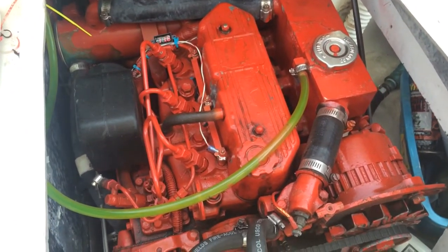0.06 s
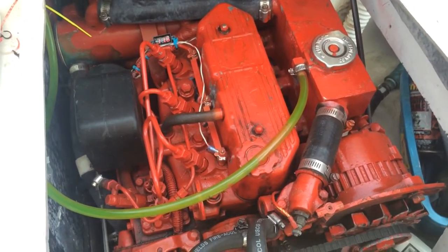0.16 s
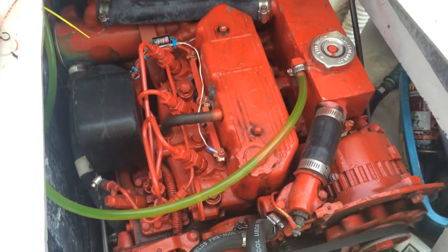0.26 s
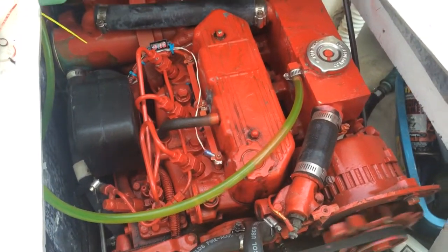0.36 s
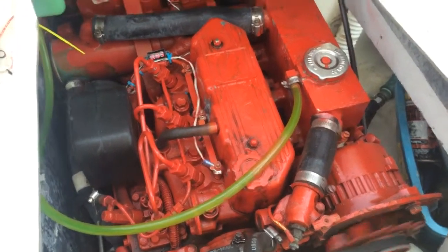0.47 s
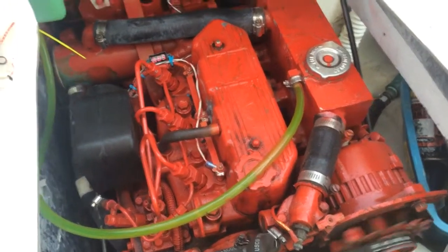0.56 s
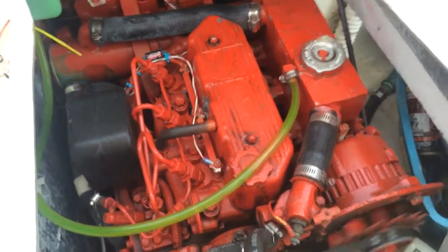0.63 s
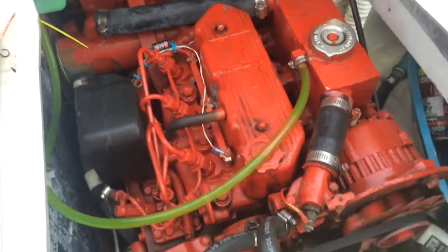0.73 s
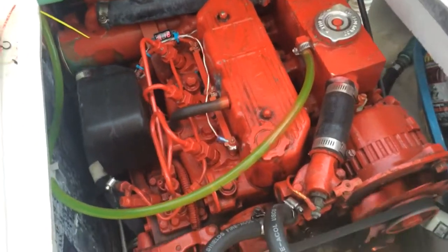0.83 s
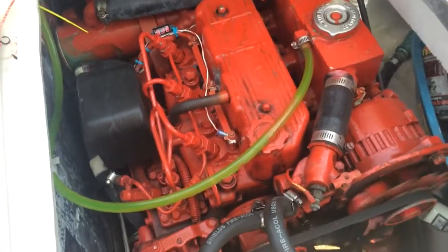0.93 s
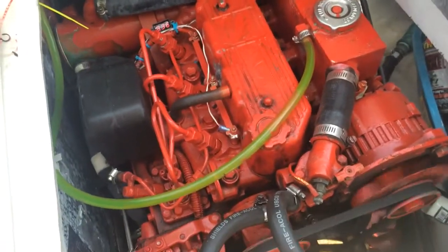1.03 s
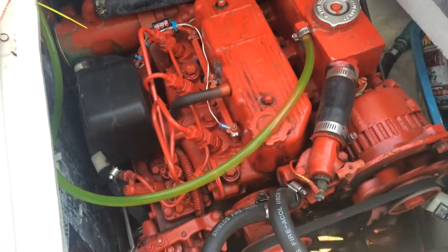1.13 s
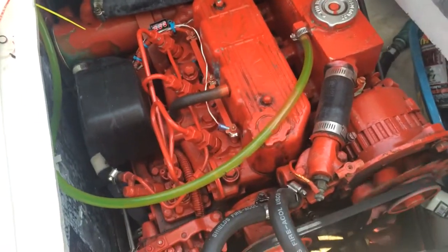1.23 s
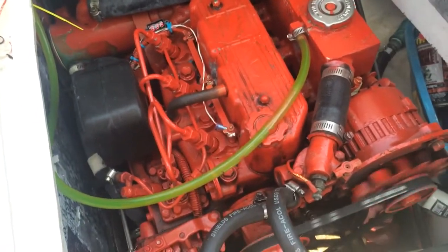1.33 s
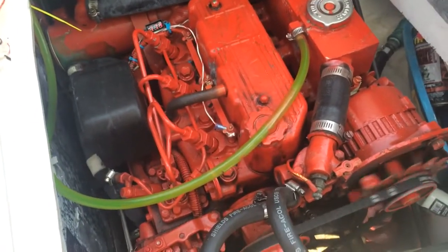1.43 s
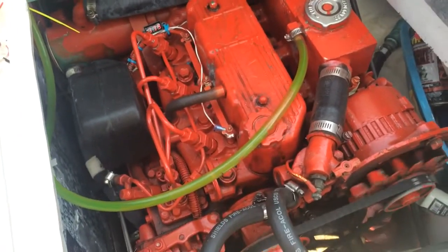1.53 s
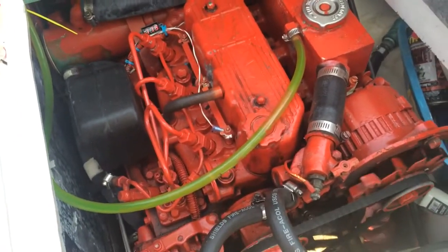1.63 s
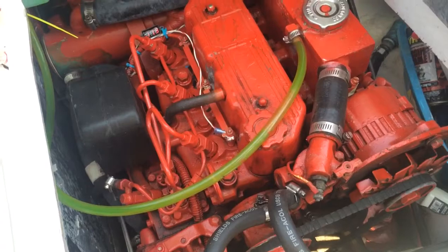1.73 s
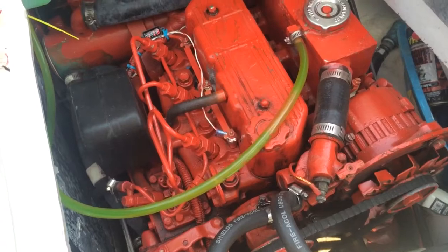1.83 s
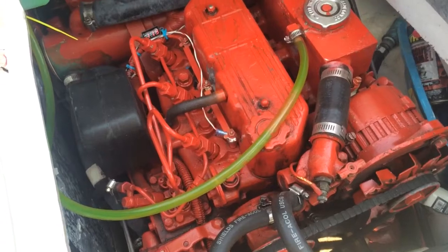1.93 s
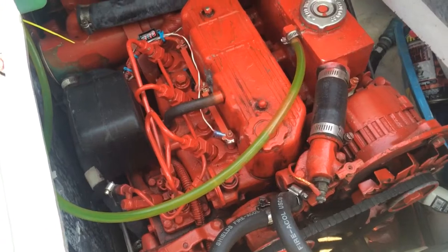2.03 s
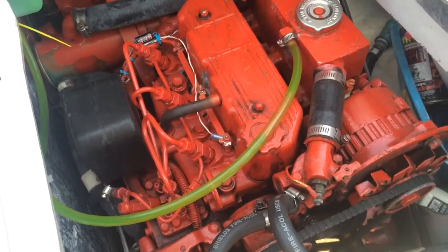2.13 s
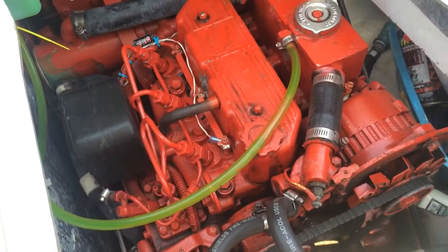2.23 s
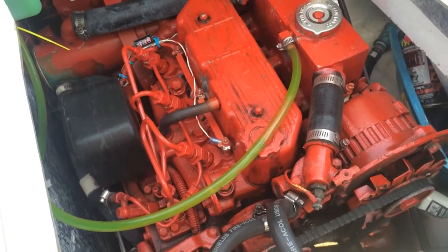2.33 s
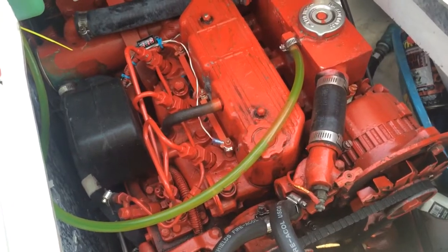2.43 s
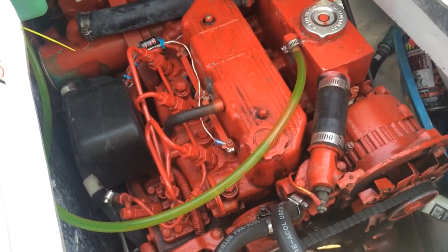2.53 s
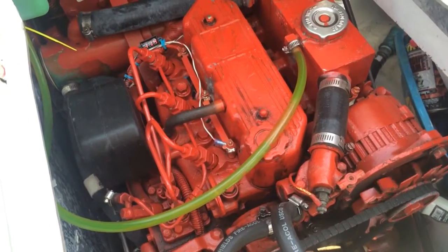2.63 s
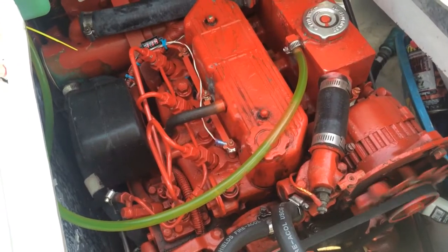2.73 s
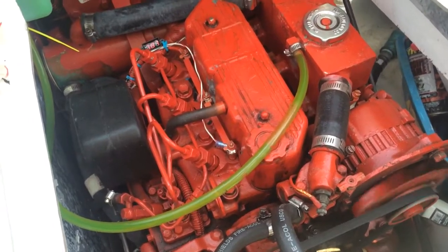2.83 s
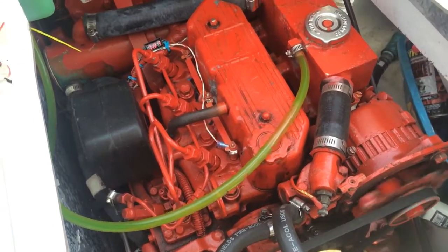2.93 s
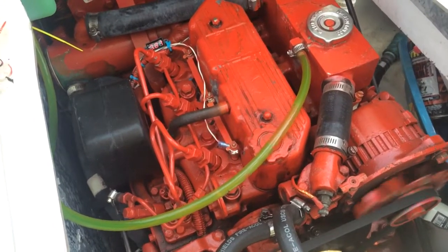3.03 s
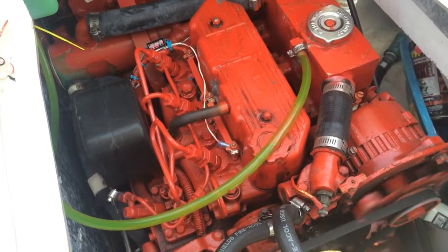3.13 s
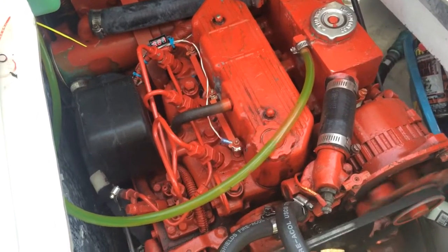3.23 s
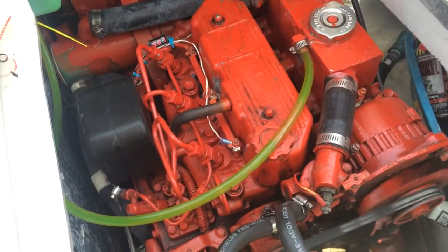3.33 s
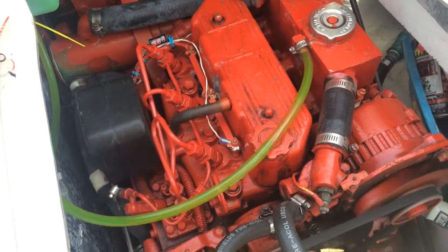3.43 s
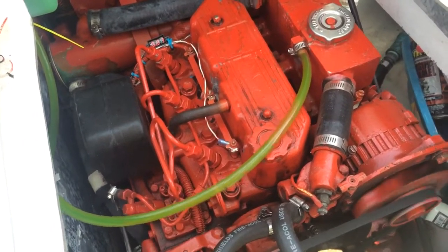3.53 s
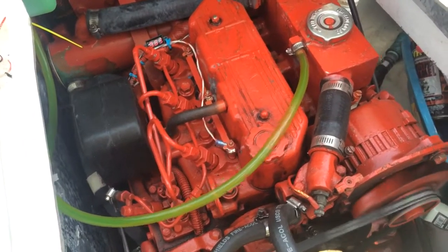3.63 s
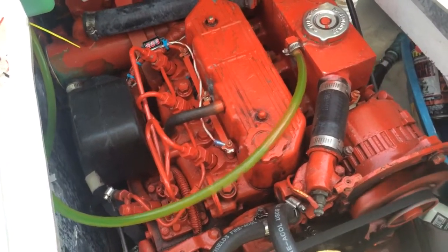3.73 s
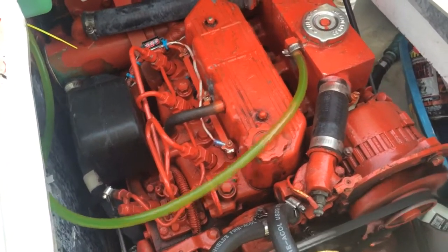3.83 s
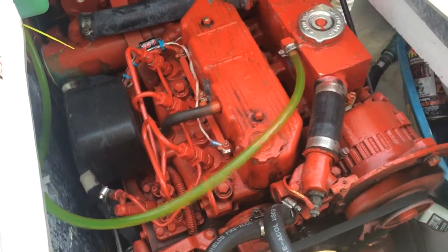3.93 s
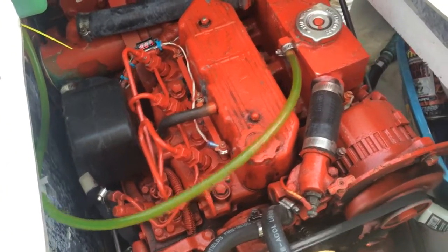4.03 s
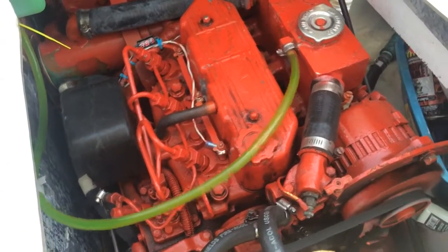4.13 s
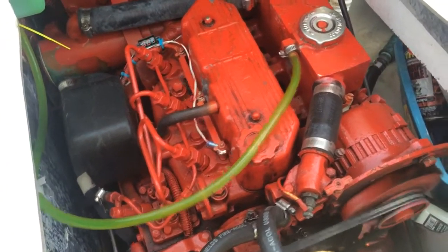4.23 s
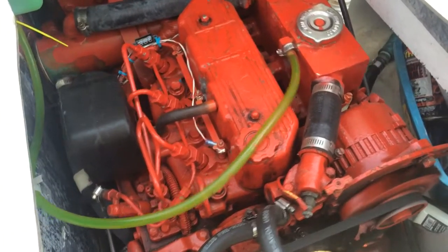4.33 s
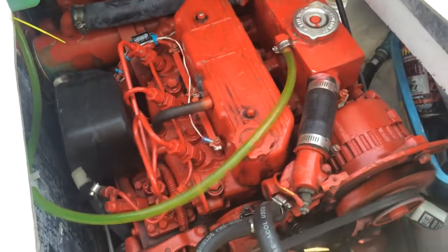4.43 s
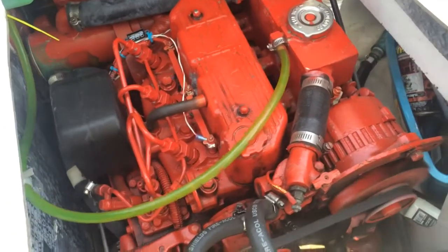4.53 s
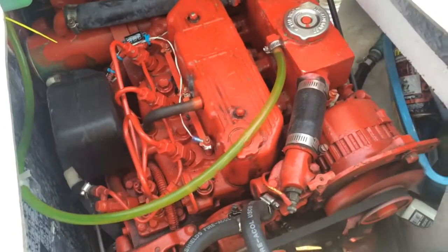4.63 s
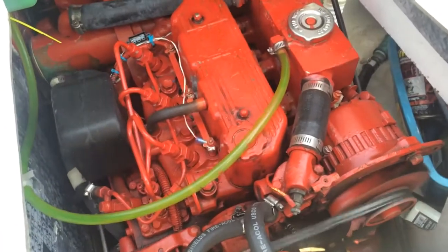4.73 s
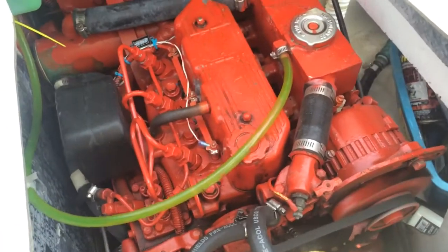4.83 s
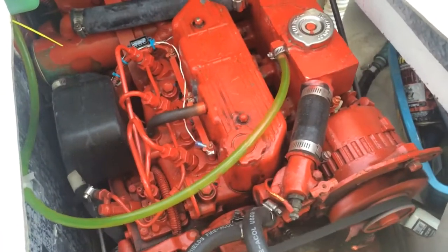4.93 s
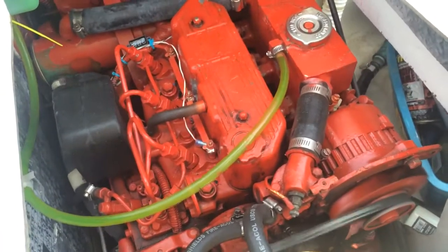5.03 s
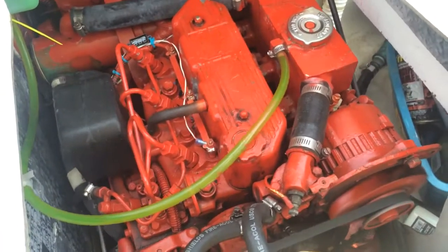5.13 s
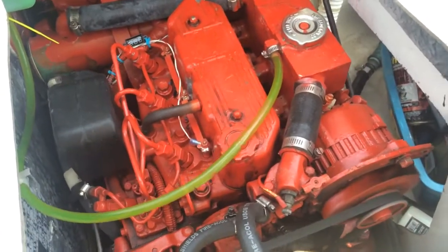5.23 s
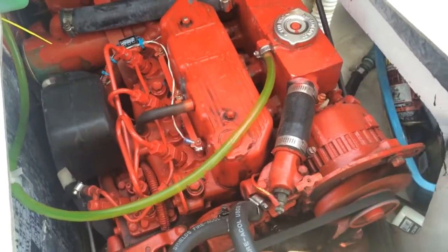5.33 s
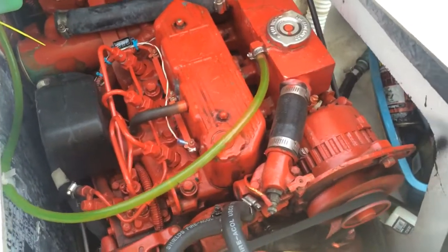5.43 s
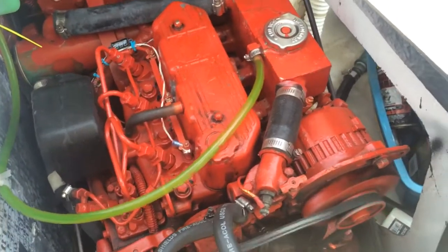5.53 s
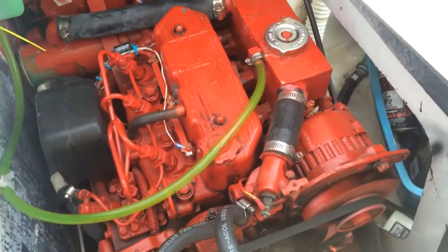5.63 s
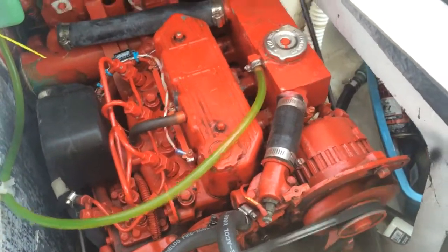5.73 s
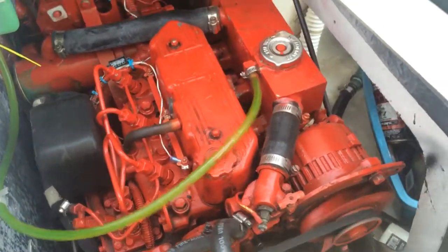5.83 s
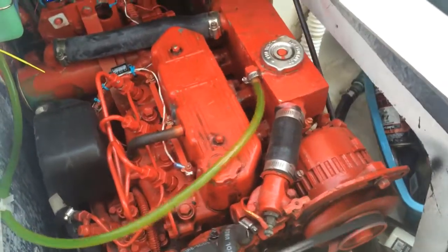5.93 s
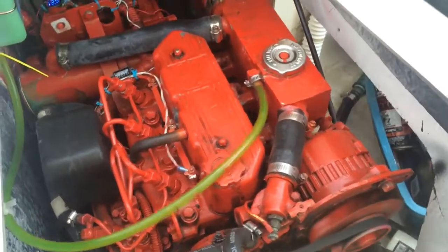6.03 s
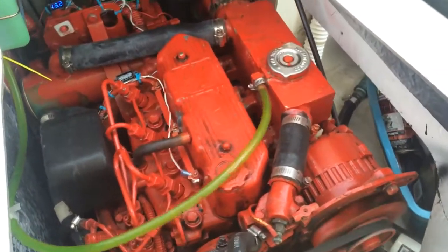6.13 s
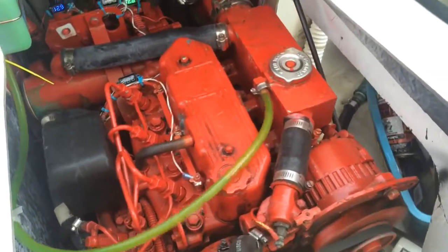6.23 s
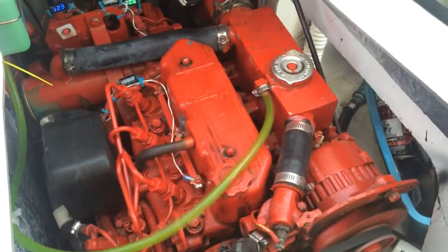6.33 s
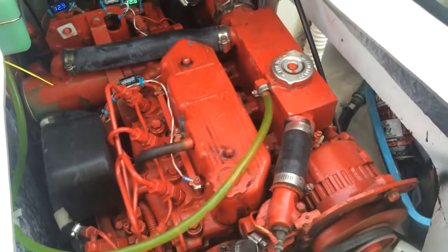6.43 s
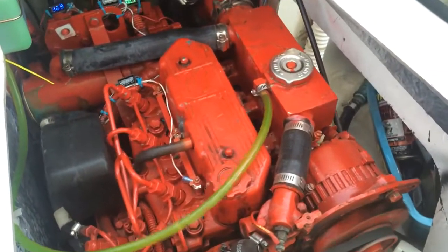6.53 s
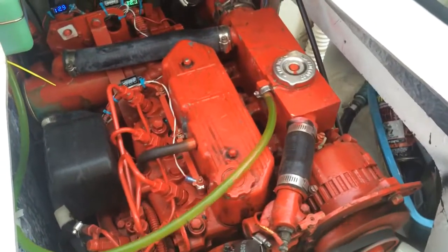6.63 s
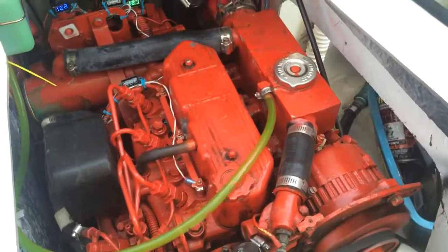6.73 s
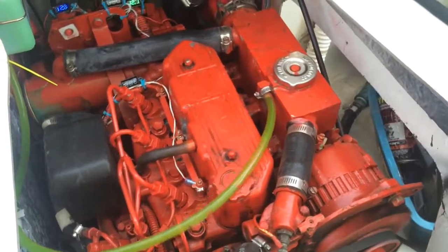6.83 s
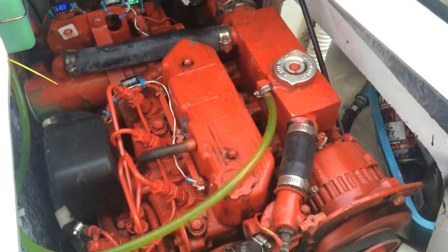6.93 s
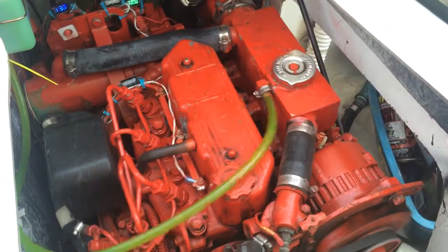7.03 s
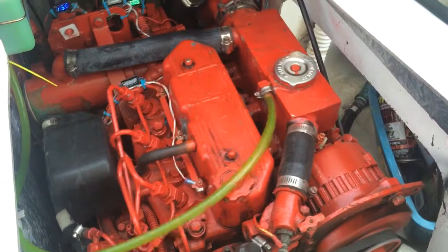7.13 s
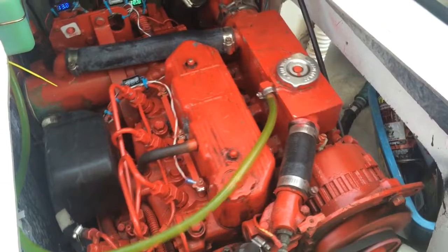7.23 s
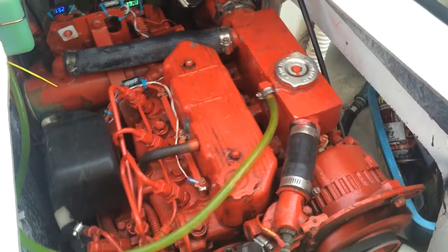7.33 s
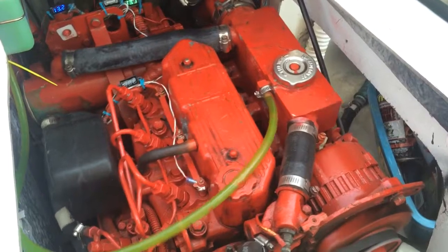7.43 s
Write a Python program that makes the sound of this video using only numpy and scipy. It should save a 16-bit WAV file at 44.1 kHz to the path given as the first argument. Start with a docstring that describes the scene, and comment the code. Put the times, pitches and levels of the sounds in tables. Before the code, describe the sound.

Close above an open engine box on a quiet mooring, faint air, a soft deck slide and a barely audible fuel-pump tick. At 0.2 s the starter gear slams in and growls, grinding and rattling in about six uneven heaves with short whines, weakening to a last scrape by 1.6 s. A clack at 1.9 s, a soft low thump at 2.2 s and a light rustle fill the pause. At 2.7 s the gear bangs in again and cranks in quick surges. From 3.4 s the diesel coughs and knocks, catches, and by 4.1 s pulls loudly with booming thuds, hard clacks and thin high squeaks. Around 4.5 s the load drops; it overshoots fast, with rapid metallic knocking, then slows through 5-6.7 s into a lumpy, clattering, boomier beat. A dull hull bump sounds near 6.1 s. From 7 s it surges louder and faster, still running at the end, about 7.5 s.

```python
"""A starter grinds a small boat diesel over, lets go and tries again; the engine catches, races,
sags with hard knocks and hunts around its idle speed. The microphone is just above the open engine
box of the three-cylinder, at a quiet mooring. Gear-tooth contacts drive the starter's growl and
rattle; a firing count times the engine's shakes, raps, clacks and ringing castings; filtered noise
makes the blows, the deck sounds and the air."""
import sys
import numpy as np
from scipy import signal
from scipy.fft import rfft, irfft, next_fast_len
from scipy.io import wavfile
from scipy.ndimage import uniform_filter1d, map_coordinates

SR = 44100
rng = np.random.default_rng(int(sys.argv[2]) if len(sys.argv) > 2 else 0)


def int16_out(signal):
    """Quantize to a 16-bit WAV file."""
    q = np.round(np.clip(np.atleast_2d(signal).T, -1, 1) * 32767)
    wavfile.write(sys.argv[1], SR, q.astype(np.int16))


N = 329868
TIME = np.arange(N) / SR

# Tone of the quiet mooring: (frequency [Hz], gain [dB])
QUIET = [(25, -8.5), (53, 2), (100, -5.5), (210, -8), (290, -24.5), (450, -24), (900, -31.5), (2600, -45),
         (5500, -46), (7200, -39.5), (9500, -52), (15800, -61)]
# Soft slides on deck: (time [s], half length [s], level [dB], treble corner [Hz])
SLIDES = [(0.038, 0.077, -49.5, 554), (2.343, 0.048, -51, 2800)]
# Tone of those slides: (frequency [Hz], gain [dB])
RUSTLE = [(60, -21.5), (200, 9.5), (500, 2), (900, -6), (2200, -12), (3200, -27), (8000, -38.5)]
# Dull bumps in the hull: (time [s], relative peak [dB], t60 [s])
BUMPS = [(.547, -21.5, 0.052), (3.54, -24, 0.092), (3.665, -20, 0.21), (3.845, -20.5, .12),
         (4.048, -12.5, 0.07), (4.096, -22.5, 0.0601), (6.145, -12.5, 0.24)]
# Tone of the hull: (frequency [Hz], gain [dB])
HULL = [(25, -28), (55, 16), (110, -8.5), (230, 0), (400, -11), (1500, -28.5), (6000, -51)]
# A deck panel hums after a soft thump: (frequency [Hz], relative level [dB], t60 [s])
PANEL = [(110, -7, 0.28), (199, -7, 0.25)]

# The starter is switched on: (from [s], to [s])
TRIES = [(.2, 1.645), (2.671, 4.2)]
# Swells of the cranking: pistons heaved over compression, the starter running down, a last short
# grind: (take-up [s], crest [s], top speed [teeth/s], growl [dB], grinding [dB], rattle [dB])
SWELLS = [(0.214, 0.416, 289, -26.5, -30, -26), (0.573, 0.606, 352, -27, -31.5, -30.5),
          (0.692, 0.809, 384, -28, -30.5, -26.5), (0.896, 1.021, 356, -28, -30, -26.5),
          (1.165, 1.193, 373, -27.5, -34, -30), (1.273, 1.377, 370, -34, -30, -27.5),
          (1.475, 1.528, 193, -43, -41, -43), (1.547, 1.598, 158, -49, -41.5, -53),
          (2.684, 2.796, 218, -34.5, -31.5, -29), (2.938, 2.944, 355, -32, -31.5, -35),
          (3.031, 3.136, 395, -33.5, -28, -26.5), (3.195, 3.34, 358, -32.5, -27.5, -26),
          (3.375, 3.384, 320, -39, -38, -30.5)]
# Growl, grinding and rattle follow a swell:
# (rise [dB/s], hold [s], release [dB/s], freewheeling level [dB])
STRAIN = [(41, 0.034, 183.5, -41), (64.2, 0.017, 375, -44), (44.4, 0.027, 229, -37)]
# The pinion is fastest just before a crest, then sags
LEAD_S, SAG_TEETH_PER_S2, SLOWEST_TEETH_PER_S = .045, 800, 105
# Starter growl: (frequency [Hz], gain [dB])
GROWL = [(30, -16.5), (60, -7), (130, -3), (240, -4.5), (310, 3.5), (430, -1.5), (560, -10), (660, -25),
         (795, -15.5), (930, -20.5), (1430, -35.5)]
# Starter grinding: (frequency [Hz], gain [dB])
GRIND = [(530, -38), (900, -5), (1430, 2.5), (2200, -7), (2510, 0), (3300, -5.5), (5000, -7.5),
         (6500, -33.5)]
# Starter rattle: (frequency [Hz], gain [dB])
RATTLE = [(2350, -46.5), (4000, -4), (6300, 0), (7310, 4), (9860, -17), (11300, -16.5), (14600, -26.5),
          (15400, -31.5), (15800, -54.5)]
# Juddering starter mounting: (frequency [Hz], gain [dB])
SHUDDER = [(150, -23), (300, -5.5), (420, 7.5), (560, 0), (790, 2), (900, -17), (1300, -34.5)]
# The judder's level when the growl reaches SHUDDER_FROM_DB; it grows twice as fast in dB
SHUDDER_DB, SHUDDER_FROM_DB = -30, -28
# Short whines and squeaks of the starter drive:
# (start [s], end [s], from pitch [Hz], to pitch [Hz], level [dB])
WHINES = [(0.322, 0.41, 731, 878, -26), (.47, 0.556, 2410, 3560, -48), (1.067, 1.168, 2807, 3600, -48),
          (1.805, 1.821, 1210, 1284, -48), (2.574, 2.589, 1146, 1125, -57), (2.82, 2.936, 2380, 3400, -45),
          (3.705, 3.88, 4980, 5370, -37), (4.394, 4.59, 5440, 4900, -44.5)]
# Gear slams and kicks, with a faint rustle and a clack after the first try:
# (time [s], relative edge [dB], relative body [dB], t60 [s])
GEAR_BLOWS = [(.197, -17, -18, 0.13), (.206, 1, -2, 0.16), (.573, -3.5, -18, 0.24),
              (.866, -13, -13.5, 0.76), (1.164, -1.5, -3, 0.15), (1.276, -7.5, -19, 0.082),
              (1.338, -6.5, -5.5, 0.074), (1.885, -39, -46, 0.3), (1.943, -17.5, -12.5, 0.098),
              (2.669, 4, -13.5, 0.094), (2.938, -1.5, -25, 0.19), (3.031, -11, -10, 0.077),
              (3.196, -6.5, -16, 0.069)]
# Tone of those blows: (frequency [Hz], gain [dB])
GEAR_TONE = [(120, -49.5), (200, 0), (359, -11), (964, -11), (1900, -14.5), (2150, -20), (2540, -12),
             (4730, -17), (7070, -5), (9470, -25), (15000, -34.5), (15800, -52)]

# Engine speed: (time [s], firing rate [1/s])
SPEED = [(3.5, 12.46), (3.8, 18.18), (4.15, 22.38), (4.3, 22.33), (4.8, 28.29), (5.2, 26.01), (5.7, 21.64),
         (6.2, 18.67), (6.75, 16.34), (7.05, 20), (7.48, 24.49)]
# The engine grows loud when it pulls on full fuel: (time [s], effort [0-1])
EFFORT = [(3.88, 0.04), (4.15, 0.78), (4.33, 0.63), (4.48, 0.04), (7.02, 0), (7.3, 0.84), (7.48, 0.8)]
# It overshoots and sinks back on little fuel: (time [s], share [0-1])
OVERRUN = [(4.42, 0.07), (4.52, 0.48), (4.72, 0.89), (5.1, 0.91), (5.7, 0.38), (5.88, 0.43), (6.12, 0)]
CYCLE_START_S = 4.857  # a moment when the first cylinder fires
CATCH_S, BUILD_S, BUILD_DB = 3.42, 0.409, 5  # the thud builds up once the engine catches
# Hull boom, strongest when the engine pulls near 20 firings a second: (time [s], level [dB])
BOOM = [(3.5, -41), (3.85, -22), (4.1, -22), (4.42, -23.5), (4.56, -35.5), (5.6, -38.5), (5.9, -26.5),
        (6.2, -23), (6.8, -29), (7.0, -20), (7.48, -30)]
# Hull shake: (multiple of the firing rate [-], relative level [dB])
SHAKE = [(2, -1.8), (8 / 3, -11.5), (3, 0), (4, -5.5), (5, -6.5)]
# Dull combustion thud: (frequency [Hz], gain [dB])
THUD = [(35, -27), (70, 1.5), (125, 1), (175, -4.5), (240, 0), (310, -11), (400, -6.5), (590, -18),
        (760, -25), (1000, -39), (1400, -61.5)]
# Hardness of the clatter: (time [s], relative level [dB])
HARDNESS = [(3.45, -6.5), (3.85, 2.5), (4.28, 2.5), (4.5, -3), (4.7, 1), (5.35, 0), (5.9, 1.5), (6.3, -2),
            (6.75, -4.5), (7.0, 0), (7.48, 0)]
# Valves and injection pump, in a fixed order: (place in the cycle [firings], relative level [dB])
VALVES = [(.08, -1), (.38, 1), (.62, -6), (1.13, 2), (1.4, -4), (2.1, -3), (2.43, 0), (2.7, -5)]
# Tone of the engine block: (frequency [Hz], gain [dB])
BLOCK = [(470, -1.5), (800, -9.5), (1140, -2), (1740, -1), (2280, -5), (3130, 0.5), (5200, -11),
         (6760, -49.5)]
# Tone of the ticking cover: (frequency [Hz], gain [dB])
COVER = [(2530, -30), (4300, -10), (5290, -11), (7170, 0.5), (8590, -12.5), (10300, -19), (13900, -24),
         (15800, -37)]
# Resonances of the iron castings: (frequency [Hz], width [Hz], gain [dB])
IRON = [(382, 29, -7), (701, 14, 2.5), (821, 24, 5.5), (896, 11.7, -2), (1285, 37, -6.5), (1500, 52, 0.5),
        (1917, 310, 1.5), (2540, 50, 0), (3180, 81, -15.5), (5570, 80, -9.5), (7050, 89, -1),
        (7370, 62, -1.5)]
# From 3.7 s each firing clacks, louder and softer by turns: (time [s], relative level [dB])
CLACKING = [(3.7, -2), (3.901, -4), (4.0, 4), (4.25, 2.5), (4.41, -5.5), (5.7, -11), (6.12, 1.5),
            (6.45, -11.5), (6.88, -6), (7.0, -1), (7.4, 3)]
# Single firings that clack out above the rest: (time [s], relative level [dB])
HARD_CLACKS = [(3.943, 5), (4.478, -1), (5.981, 2), (6.641, -3), (7.316, 9)]
# What a clack rings with: (frequency [Hz], relative level [dB], t60 [s])
CLACK_RING = [(1617, -2.5, 0.031), (1776, -7.5, 0.044), (1967, -4.5, 0.044), (2810, -20, 0.021),
              (3140, -12.5, 0.019), (3620, -11, 0.0096)]
# Thin chirps at full fuel: (time [s], level [dB])
SQUEAKS = [(4.052, -31), (4.148, -28), (4.236, -28), (4.279, -33), (4.327, -34), (4.372, -41), (7.146, -32),
           (7.369, -28), (7.413, -30)]
# Single hard metallic knocks: (time [s], relative edge [dB], relative body [dB], t60 [s])
KNOCKS = [(3.448, -15, -17, 0.29), (3.522, -15.5, -10, 0.052), (3.601, -8.5, -6, 0.12),
          (3.668, -12.5, -10, 0.184), (3.79, -13, -34, 0.13), (3.849, -17, -19, 0.038),
          (4.438, -13.5, -28, 0.044), (5.441, -14, -16, 0.1), (5.476, -18, -26, .05),
          (5.557, -23, -13, 0.15), (5.742, -16, -27, 0.047), (5.855, -16.5, -7, 0.076),
          (6.003, -11, -22, 0.028), (6.036, -15.5, -16, 0.05), (6.824, -16, -26, 0.05)]
# Tone of a knock: (frequency [Hz], gain [dB])
KNOCK = [(260, -28.5), (450, -23.5), (1180, -15.5), (1400, -17.5), (1970, -13), (2490, -20), (3120, -9),
         (4080, -8), (4520, -14.5), (5910, -9.5), (6180, 0.5), (7180, 0.5), (8330, -15), (14000, -34),
         (15800, -67)]
# While the engine overshoots and then sinks, each cylinder knocks once a cycle:
# (place in the cycle [firings], edge offset [dB], body offset [dB], t60 [s])
CYLINDERS = [(0, -17, -2, .075), (1.07, -4.5, -12, .06), (2.0, -22, -10, .07)]
# That spell swells and fades, added to each cylinder:
# (time [s], edge offset [dB], body offset [dB])
KNOCKING = [(4.5, -13, -10), (4.65, -2.5, 1.5), (4.88, 3, 0), (5.0, -6.5, -2.5), (5.09, -6.5, 4),
            (5.2, -1, -5), (5.78, -17, -12.5)]
# What a hard firing rings with: (frequency [Hz], relative level [dB], t60 [s])
KNOCK_RING = [(681, -11, 0.19), (1172, -7.5, 0.062), (1280, -5, 0.05), (1715, -15, 0.056),
              (2020, -13, 0.11), (2780, -8.5, 0.05), (3070, -5.5, 0.09), (3470, -10.5, 0.13),
              (3550, -11, 0.082)]
# The first firings cough in the manifold: (time [s], relative level [dB])
COUGHS = [(3.437, -28), (3.525, -37), (3.655, -26.5), (3.843, -25), (3.945, -33.5)]
# What the manifold rings with: (frequency [Hz], relative level [dB], t60 [s])
MANIFOLD = [(127, 4, 0.18), (265, -5, 0.13), (373, 0.5, 0.17), (689, -2, 0.17), (770, -14, .14)]

TOP_HZ = 15600  # upper band limit of the microphone chain


def amp(db):
    """Decibels to gain."""
    return 10 ** (np.asarray(db) / 20)


def unit(x):
    """Scaled to rms 1."""
    return x / np.sqrt(np.mean(x ** 2) + 1e-20)


def curve(rows):
    """One value per sample from (time [s], value) rows."""
    return np.interp(TIME, *np.transpose(rows))


def wobble(rate):
    """A smooth random curve, rate knots a second."""
    coarse = TIME[::32]
    knots = rng.standard_normal(int(N * rate / SR) + 4)
    return np.interp(TIME, coarse, map_coordinates(knots, [coarse * rate]))


def steady(x):
    """Evened out towards rms 1 over a moving 0.16 s."""
    power = np.abs(uniform_filter1d(x ** 2, size=7000))
    return x / np.sqrt(power + 1e-4 * np.mean(x ** 2))


def filtered(x, response, size=8192):
    """x through the impulse response of a complex function of frequency."""
    return signal.oaconvolve(x, irfft(response(np.fft.rfftfreq(size, 1 / SR))))[:N]


def colour(x, points):
    """A causal, minimum-phase filter through (frequency [Hz], gain [dB]) points."""
    def response(hz):
        f, db = np.transpose(points)
        gain_db = np.interp(np.log(hz + 1), np.log(f), db)
        cepstrum = irfft(np.log(amp(np.maximum(gain_db, -100))))
        # folding the cepstrum forward makes the filter causal
        cepstrum[1:] *= 2
        cepstrum[len(hz) - 1:] = 0
        return np.exp(rfft(cepstrum))
    return filtered(x, response)


def resonance(f, hz, width):
    """Response of one damped mode."""
    return 1j * f * width / (hz * hz - f * f + 1j * f * width)


def iron(x):
    """The castings ring on after whatever strikes them."""
    def response(f):
        return 1 + sum(amp(db) * resonance(f, hz, width) for hz, width, db in IRON)
    return filtered(x, response)


def strokes(phase, scatter_db, pattern=(1,), late=0):
    """An impulse at each whole turn of phase, sized by pattern and chance, with timing scatter late [s]."""
    at = np.flatnonzero(np.diff(np.floor(phase)) > 0)
    size, shift = rng.standard_normal((4000, 2))[:len(at)].T
    weight = np.resize(pattern, len(at)) * amp(scatter_db * size)
    moved = at + np.round(shift * late * SR).astype(int)
    return np.bincount(np.clip(moved, 0, N - 1), weight, N)


def bursts(impulses, t60):
    """Each impulse sets off a dying burst of noise."""
    power = signal.lfilter([1], [1, -amp(-120 / (t60 * SR))], impulses ** 2)
    return unit(np.sqrt(power) * rng.standard_normal(N))


def blows(rows):
    """Dying noise bursts from (time [s], level [dB], t60 [s]) rows."""
    envelope = np.zeros(N)
    for s, db, t60 in rows:
        after = envelope[round(s * SR):][:SR // 2]
        after += amp(db - 60 * TIME[:len(after)] / t60)
    return envelope * rng.standard_normal(N)


def impacts(rows, spectrum, split_hz):
    """Metal blows, each with its own share of low body under the bright edge."""
    s, edge_db, body_db, t60 = np.transpose(rows)

    def low(f):
        return 1 / (1 + 1j * f / split_hz) ** 2

    body = filtered(blows(zip(s, body_db, t60)), low)
    edge = filtered(blows(zip(s, edge_db, t60)), lambda f: low(f) * (f / split_hz) ** 2)
    return iron(colour(body + edge, spectrum))


def ringing(hits, modes, detune=0.0093, attack=0.00074):
    """Each (time [s], level [dB]) hit rings the modes, in a slightly different mix every time."""
    hz, level, t60 = np.transpose(modes)[:, :, None]
    out, t = np.zeros(N + SR), TIME[:SR // 4]
    for s, db in hits:
        size, shift, turn = rng.standard_normal((3, len(modes), 1))
        decay = amp(level + 2 * size - 60 * t / t60)
        partials = decay * np.sin(2 * np.pi * (hz * (1 + detune * shift) * t + turn))
        out[round(s * SR):][:len(t)] += amp(db) * partials.sum(0) * (1 - np.exp(-t / attack))
    return out[:N]


def patchy(x, depth_db):
    """The colour shifts from moment to moment in narrow patches."""
    z = signal.stft(x, nperseg=1024)[2]
    across_pitch = uniform_filter1d(rng.standard_normal(z.shape), size=3, axis=0)
    field = uniform_filter1d(across_pitch, size=4, axis=1)
    return signal.istft(z * amp(depth_db * unit(field)), nperseg=1024)[1][:N]


def switched(on, off, fade):
    """A gain that fades in to be fully open at on, and fades out after off."""
    return np.clip((TIME - on) / fade + 1, 0, 1) * np.clip(1 - (TIME - off) / fade, 0, 1) ** 2


def mooring_air():
    """The quiet of the mooring: coloured noise that sways slowly in level."""
    sway = amp(1.5 * wobble(7))
    return amp(-48.5) * sway * unit(colour(rng.standard_normal(N), QUIET))


def fuel_pump():
    """An electric fuel pump ticks softly all the while, 20.3 times a second."""
    ticks = bursts(strokes(20.3 * (TIME - 2.028), scatter_db=1), t60=.045)
    return amp(-79) * unit(colour(ticks, KNOCK)) + amp(-73.0) * unit(colour(ticks, BLOCK))


def rustle():
    """Something slides softly on the deck before each try: swelling and fading noise."""
    out = np.zeros(N)
    for s, half, db, top_hz in SLIDES:
        noise = colour(rng.standard_normal(N), RUSTLE)
        rub = filtered(noise, lambda f: 1 / (1 + 1j * f / top_hz) ** 2)
        out += amp(db) * np.exp(-((TIME - s) / half) ** 2) * unit(rub)
    return out


def thump(s, db, width):
    """Something soft lands on the deck: one low push of air."""
    u = (TIME - s) / width
    return amp(db) * (2 * u * u - 1) * np.exp(-u * u)


def hull_bumps():
    """Dull noise blows in the hull, and one soft landing that sets a deck panel humming."""
    bumps = amp(16.0) * colour(blows(BUMPS), HULL)
    return bumps + thump(2.213, db=-26.5, width=0.0038) + ringing([(2.213, -50)], PANEL)


def tooth_rate():
    """The pinion's tooth rate climbs from each take-up, then sags to its slowest."""
    rate = np.full(N, 1. * SLOWEST_TEETH_PER_S)
    for start, crest, top, *_ in SWELLS:
        i = round(start * SR)
        fastest = max(crest - LEAD_S, start + .005)
        rise = np.interp(TIME[i:], [start, fastest], [rate[i], top])
        rate[i:] = rise - SAG_TEETH_PER_S2 * np.maximum(TIME[i:] - fastest, 0)
        rate = np.maximum(rate, SLOWEST_TEETH_PER_S)
    return rate


def strain():
    """Gains of growl, grinding and rattle: each swells to a crest, holds, and drops as the gear freewheels."""
    powered = sum(switched(on + 0.11, off, fade=0.14) for on, off in TRIES)
    gains = []
    for k, (rise, hold, release, free_db) in enumerate(STRAIN):
        gain = amp(free_db) * powered
        for start, crest, _, *db in SWELLS:
            span = slice(round(start * SR), round(start * SR) + SR // 2)
            t = TIME[span] - crest
            swell_db = db[k] + rise * np.minimum(t, 0) - release * np.maximum(t - hold, 0)
            gain[span] = np.maximum(gain[span], amp(swell_db))
        gains.append(gain)
    return gains


def shudder():
    """The loudest swells of the growl make the starter's mounting judder in rough lumps."""
    growl = strain()[0]
    lumps = steady(amp(1.6 * wobble(55)) * colour(rng.standard_normal(N), SHUDDER))
    return amp(SHUDDER_DB) * (growl / amp(SHUDDER_FROM_DB)) ** 2 * lumps


def whines():
    """The starter drive whines and squeaks: short tones that glide and waver in pitch."""
    out = np.zeros(N)
    for start, end, from_hz, to_hz, db in WHINES:
        u = np.clip((TIME - start) / (end - start), 0, 1)
        waver_hz = min(.035 * from_hz, 110) * wobble(450)
        pitch = from_hz + u * (to_hz - from_hz) + waver_hz
        swell = amp(db + 2.3 * wobble(90)) * np.sqrt(4 * u * (1 - u))
        out += swell * np.sin(2 * np.pi * np.cumsum(pitch) / SR)
    return out


def starter():
    """Gear teeth meet one by one: a growling tone, with a scrape and a rattle on every tooth."""
    teeth = np.cumsum(tooth_rate() * (1 + 0.025 * wobble(60))) / SR
    growl, grind, rattle = strain()
    contacts = strokes(teeth, scatter_db=2.5, late=0.00006)
    tone = amp(-7.0) * steady(colour(contacts, GROWL))
    tone += amp(-4.5) * steady(colour(bursts(contacts, t60=0.045), GROWL))
    tone += amp(-8.5 + 5.5 * wobble(35)) * np.sin(2 * np.pi * teeth)
    # teeth bite only under load; the brushes hiss too
    bite = amp(np.minimum(20 * np.log10(grind + 1e-9) + 32, 0))
    meshing = steady(bursts(contacts, t60=0.026)) + amp(-4) * steady(contacts)
    brushes = amp(-2) * rng.standard_normal(N)
    rubbing = patchy(iron(bite * meshing + brushes), depth_db=2)
    # the ring gear sings only under load
    ring = filtered(bite * rubbing, lambda f: resonance(f, hz=1430, width=320))
    scrape = steady(colour(rubbing + amp(-5) * ring, GRIND))
    ticks = steady(colour(rubbing, RATTLE))
    uneven = amp(0.76 * wobble(70))  # worn teeth bite unevenly
    return uneven * (growl * tone + grind * scrape + rattle * ticks)


def cranking():
    """The starter's meshing teeth, juddering mounting and whines, with the metal blows around them."""
    return starter() + shudder() + whines() + impacts(GEAR_BLOWS, GEAR_TONE, split_hz=1730)


def combustion(firing, effort):
    """Firings shake the hull, ring the intake and thud in the block; on overrun boom yields to drone."""
    overrun = curve(OVERRUN)
    boom = amp(curve(BOOM))
    drone = amp(-44.5 + 19.7 * overrun + 14 * effort)
    thud = amp(-34 - 2.0 * overrun + 12.5 * effort)
    shake = sum(amp(db + 3.5 * wobble(12)) * np.sin(2 * np.pi * (k * firing + rng.random()))
                for k, db in SHAKE)
    shake = filtered(shake, lambda f: resonance(f, hz=58.6, width=20)
                     + amp(-5) * resonance(f, hz=108, width=35))
    gulps = strokes(firing, scatter_db=.8, pattern=(1, .85, .75))

    def pipe(f):
        return resonance(f, hz=184.6, width=9.7) + amp(-4.5) * resonance(f, hz=113.4, width=13.0)

    intake = filtered(gulps, lambda f: pipe(f) * resonance(f, hz=154.5, width=3.3))
    lumps = bursts(strokes(2 * firing, scatter_db=4.0, pattern=(1, .6)), t60=0.19)
    thumps = steady(colour(lumps, THUD))
    pulses = strokes(3 * firing, scatter_db=2, pattern=(1, .5, .8), late=.0004)
    pulses = steady(colour(pulses, THUD))
    build = amp(BUILD_DB * np.clip((TIME - CATCH_S) / BUILD_S - 1, -1, 0))
    thudding = build * thud * (amp(0.5) * thumps + amp(-6.0) * pulses)
    return boom * steady(shake) + drone * steady(intake) + thudding


def clatter(firing, effort):
    """Combustion raps the block; valves and injection pump tick in a fixed order each cycle."""
    hardness = curve(HARDNESS)
    block = amp(-38.0 + hardness + 4.6 * effort - 0.14 * curve(OVERRUN))
    cover = amp(-33 + hardness + 2.26 * effort)
    raps = strokes(firing, scatter_db=2.5, late=.0008)
    valves = sum(amp(db) * strokes((firing - place) / len(CYLINDERS), scatter_db=2.0, late=.0015)
                 for place, db in VALVES)
    rap = bursts(raps, t60=0.062) + bursts(valves, t60=0.16)
    tick = bursts(valves, t60=0.11)
    churn = rng.standard_normal(N)  # gears, belt and bearings fill the gaps
    knocking = iron(colour(rap + amp(5.5) * churn, BLOCK))
    ticking = iron(colour(tick + amp(-11) * churn, COVER))
    return block * steady(patchy(knocking, depth_db=2.5)) + cover * steady(patchy(ticking, depth_db=3.5))


def bark(firing, effort):
    """Each firing sets off a short throaty ring in the casing."""
    beats = bursts(strokes(firing - .12, scatter_db=.5), t60=0.1)
    ring = filtered(beats, lambda f: resonance(f, hz=263, width=19)
                    - amp(-9.0) * resonance(f, hz=713, width=47)
                    + amp(-9.5) * resonance(f, hz=935, width=16)
                    - amp(-9.0) * resonance(f, hz=1179.4, width=30))
    return amp(-46.0 + 19 * effort) * steady(ring)


def crank(firing, effort):
    """From 3.7 s each firing clacks; a thump and a throaty bark of the block grow with the effort."""
    s, db = np.transpose(CLACKING)
    # ordinary clacks give way to the hard ones close by
    times = [t for t in TIME[strokes(firing, scatter_db=0) > 0]
             if t > s[0] and all(abs(t - hard) > .02 for hard, _ in HARD_CLACKS)]
    hits = [(t, np.interp(t, s, db) + 2 * rng.standard_normal()) for t in times] + list(HARD_CLACKS)
    clacks = amp(-25.5) * ringing(hits, CLACK_RING, detune=0.03, attack=0.0015)
    cracks = amp(-20.5) * colour(blows([(t, level, .035) for t, level in hits]), BLOCK)
    thumps = steady(colour(strokes(firing - .14, scatter_db=1.5), THUD))
    return clacks + cracks + amp(-47.5 + 14.0 * effort) * thumps + bark(firing, effort)


def squeak():
    """Each chirp is one thin, high tone that dies quickly."""
    return ringing(SQUEAKS, [(8980, 0, 0.15)], detune=0.0016, attack=0.0036)


def knock_spell(firing):
    """Rows of blows, one for each cylinder in each cycle of three firings."""
    s, edge, body = np.transpose(KNOCKING)
    cycles = np.arange(np.ceil(firing[0] / 3), firing[-1] / 3)
    rows = []
    for place, edge_db, body_db, t60 in CYLINDERS:
        times = np.interp(len(CYLINDERS) * cycles + place, firing, TIME)
        rows += [(t, edge_db + np.interp(t, s, edge), body_db + np.interp(t, s, body), t60)
                 for t in times if s[0] < t < s[-1]]
    return rows


def engine():
    """The running diesel: its speed times the firings and valves, its effort sets the loudness."""
    firing = np.cumsum(curve(SPEED)) / SR
    firing -= np.interp(CYCLE_START_S, TIME, firing)
    effort = curve(EFFORT)
    running = combustion(firing, effort) + clatter(firing, effort) + crank(firing, effort) + squeak()
    spell = knock_spell(firing)
    knocks = impacts(list(KNOCKS) + spell, KNOCK, split_hz=2800)
    ring = amp(-21.5) * ringing([(s, body_db) for s, _, body_db, _ in spell], KNOCK_RING)
    coughs = ringing(COUGHS, MANIFOLD, attack=0.007)
    return switched(CATCH_S, TIME[-1], fade=0.033) * running + knocks + ring + coughs


def scene():
    """Starter, engine and hull over the quiet of the mooring, the same in both channels."""
    background = mooring_air() + fuel_pump() + rustle() + hull_bumps()
    return np.tile(background + cranking() + engine(), (2, 1))


def record(dry):
    """The microphone chain passes nothing above its band limit."""
    m = next_fast_len(N)
    passed = np.fft.rfftfreq(m, 1 / SR) < TOP_HZ
    return irfft(rfft(dry, m) * passed, m)[:, :N]


dry = scene()
out = record(dry)
int16_out(out)
```